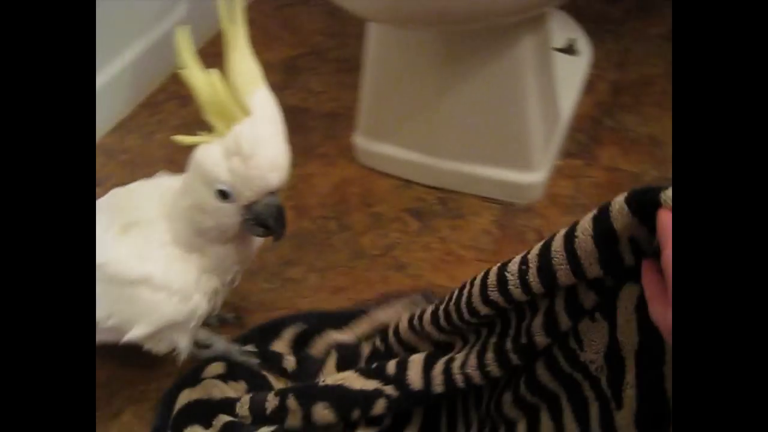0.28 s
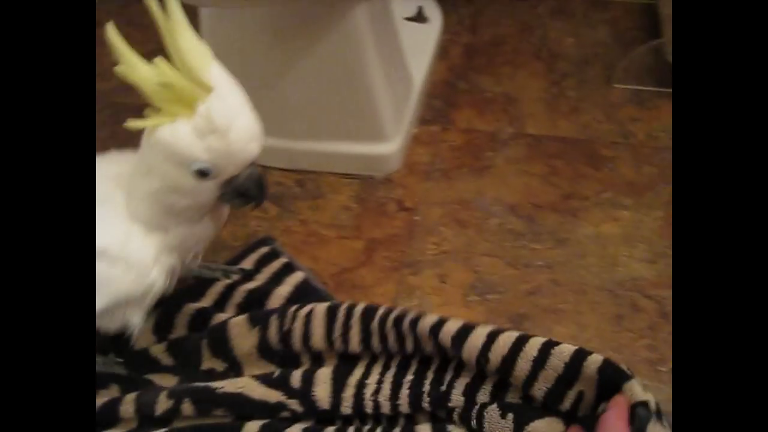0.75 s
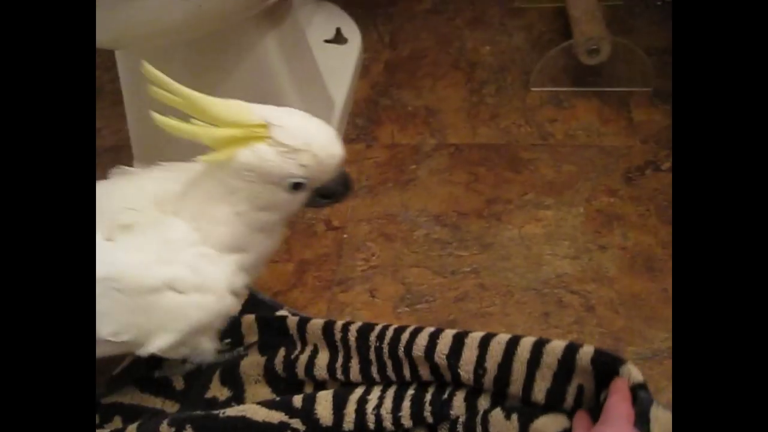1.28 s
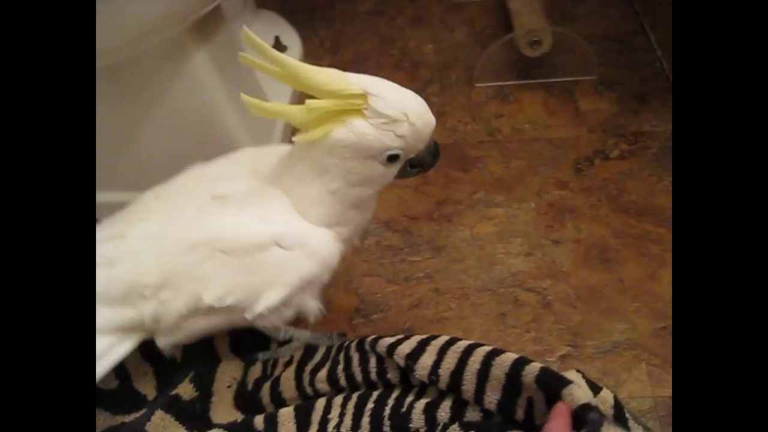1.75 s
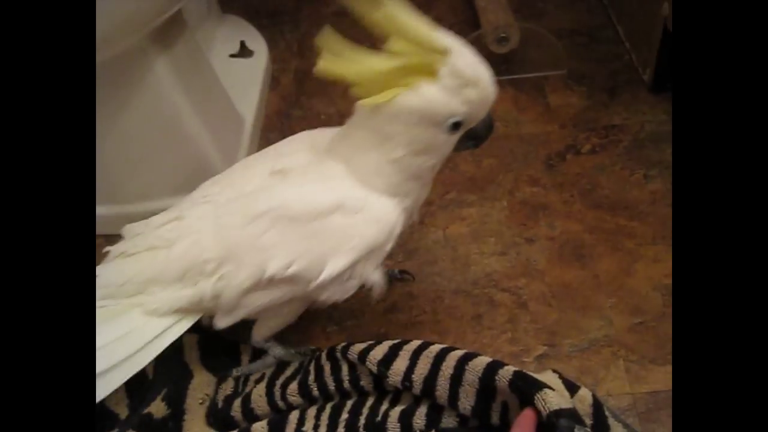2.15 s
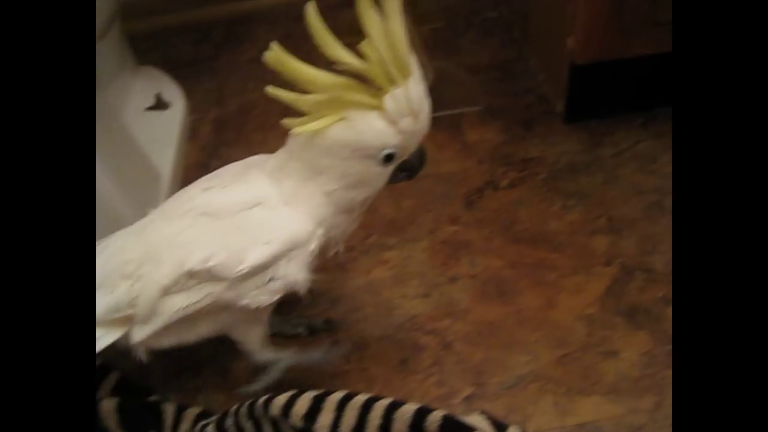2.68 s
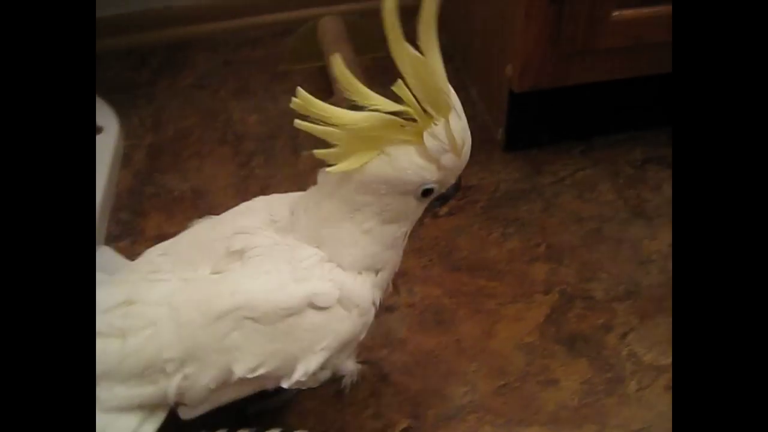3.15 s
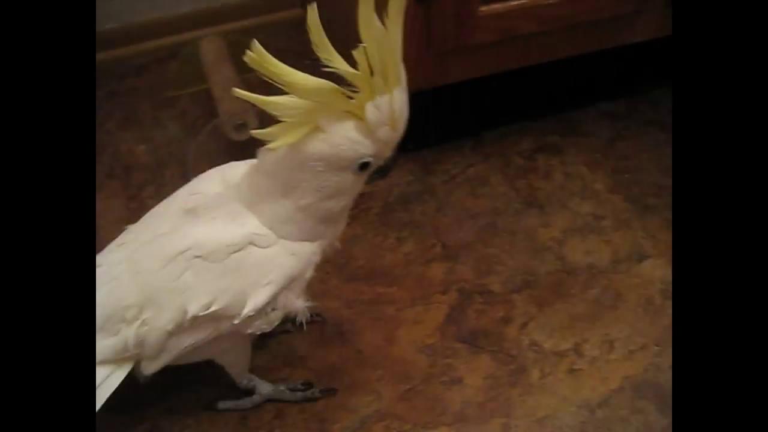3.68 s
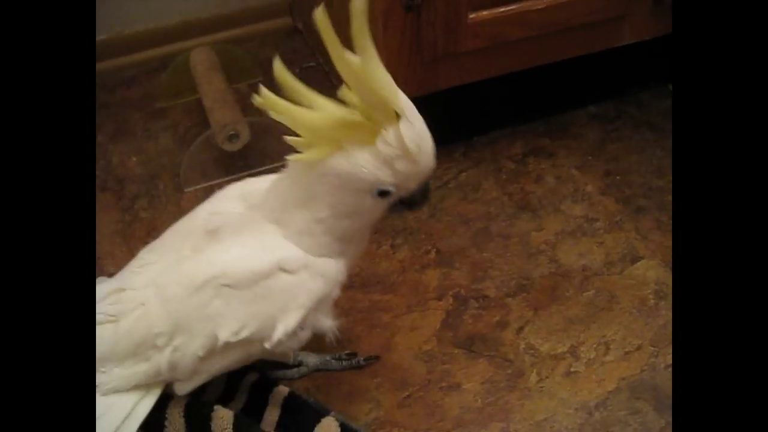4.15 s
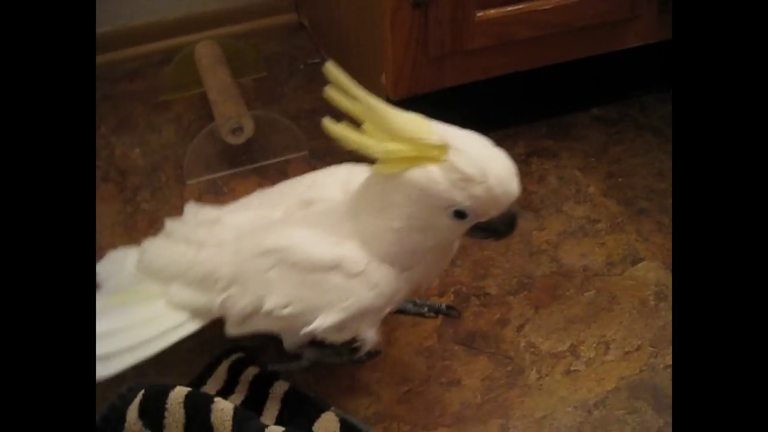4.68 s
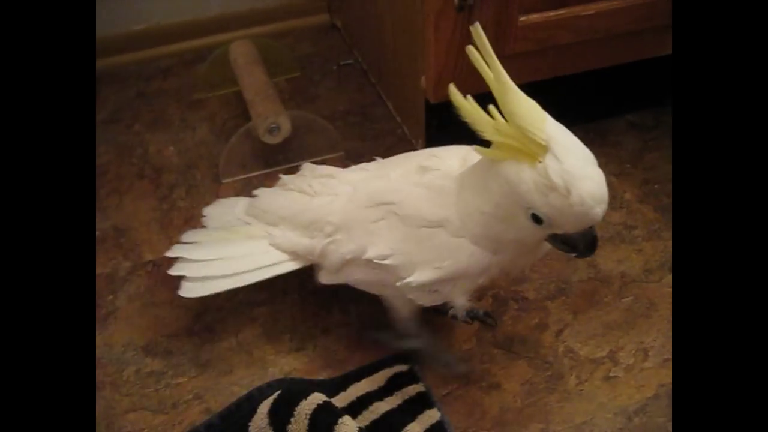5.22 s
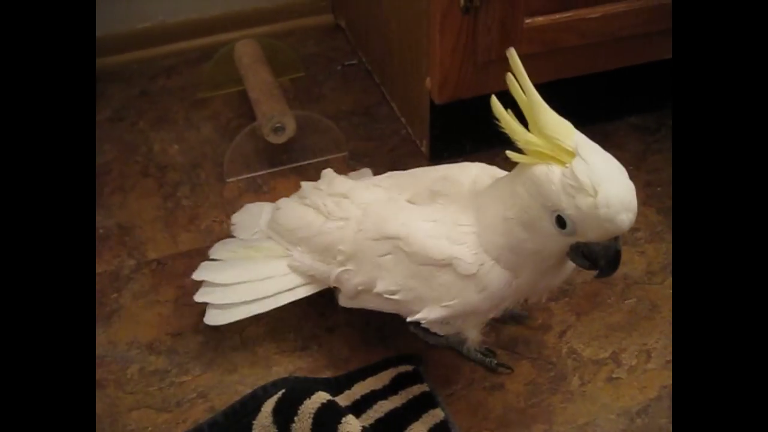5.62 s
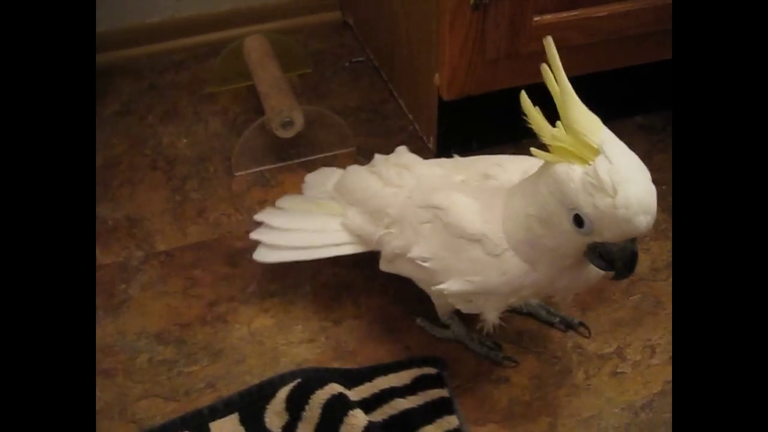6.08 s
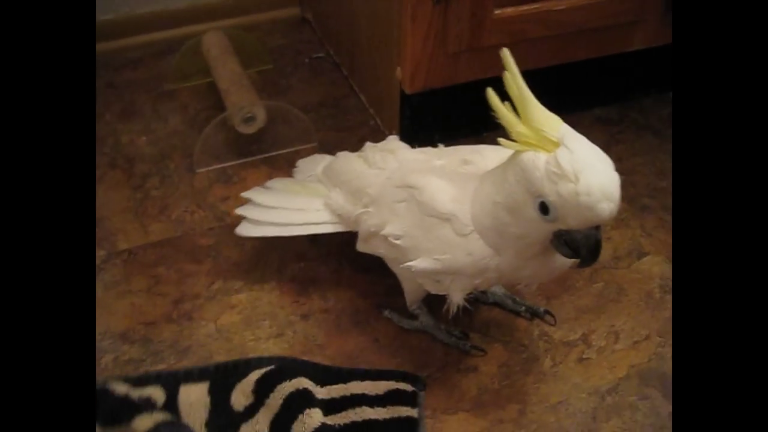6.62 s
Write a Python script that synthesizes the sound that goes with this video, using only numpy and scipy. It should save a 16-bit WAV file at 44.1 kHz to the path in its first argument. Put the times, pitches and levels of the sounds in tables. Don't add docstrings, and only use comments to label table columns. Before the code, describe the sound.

In a small hard-walled bathroom, a cloth drags over the floor while a big parrot's claws tick and snap on vinyl, close to a small camera microphone. A few steps land hard with a slight floor thump. Later, short falling clucks join soft swishes of feet and feathers, then the bird quiets. Fan hum and hiss continue throughout.

```python
import sys
import numpy as np
from scipy import signal
from scipy.fft import rfft, irfft
from scipy.io import wavfile
from scipy.ndimage import uniform_filter1d

SR = 44100
rng = np.random.default_rng(int(sys.argv[2]) if len(sys.argv) > 2 else 0)


def voltage_ratio(level):
    return 10 ** (np.asarray(level, float) / 20)


def store_pcm(level_fs):
    pcm = np.round(np.clip(level_fs, -1, 1) * 32767).astype(np.int16)
    wavfile.write(sys.argv[1], SR, np.atleast_2d(pcm).T)


N = 301991


def evened(x):
    return x / np.sqrt(np.mean(x ** 2) + 1e-20)


def read(points, hz):
    f, value = np.transpose(points)
    return np.interp(np.log(hz + 1), np.log(f + 1), value)


def add(mix, s, sound):
    part = mix[round(s * SR):][:len(sound)]
    part += sound[:len(part)]


def resonate(x, hz, width):
    turn = np.exp(2j * np.pi * np.cumsum(hz * np.ones(len(x))) / SR)
    r = np.exp(-np.pi * width / SR)
    return 2 * (turn * signal.lfilter([1 - r], [1, -r], x / turn + 1e-18)).real


def coloured(x, points):
    gain_db = np.maximum(read(points, abs(np.fft.fftfreq(2048, 1 / SR))), -100)
    log_gain = np.log(voltage_ratio(gain_db))
    taps = np.fft.ifft(np.exp(np.conj(signal.hilbert(log_gain)))).real[:1024]
    return signal.oaconvolve(x, taps)[:len(x)]


def tails(count):
    # (frequency [Hz], t60 [s])
    room_t60 = [(250, 0.48), (450, 0.34), (800, 0.31), (1700, 0.28), (4600, 0.28), (10000, 0.28)]
    shape = (count, SR // 2)
    taps = rng.choice([-1., 1.], shape) * (rng.random(shape) < .3)
    hz, t, z = signal.stft(taps, SR, nperseg=256)
    decay = voltage_ratio(-60 * t / read(room_t60, hz)[:, None])
    tail = signal.istft(z * decay, SR, nperseg=256)[1]
    tail *= np.clip(np.arange(tail.shape[1]) / SR / 0.0094 - .1, 0, 1)
    return tail / np.linalg.norm(tail, axis=1, keepdims=True)


def in_room(sound, tail, chance, echo_db, wet_db):
    echo_delays = [.9, 2.2, 3.0, 3.6, 5.4, 6.4, 8.2, 11.0]
    echo_levels = [0.5, -6.5, -1.5, 0.5, -7, -1.5, -9, -11]
    place = np.int_((echo_delays + .1 * chance[:8]) * SR / 1000)
    echoes = np.zeros(len(tail))
    echoes[place] = voltage_ratio(np.add(echo_levels, echo_db) + 0.9 * chance[8:16])
    scatter = chance[16:] * np.exp(-np.arange(len(chance) - 16) / SR / 0.0005)
    scatter = signal.lfilter(*signal.butter(1, 1800, "high", fs=SR), scatter)
    scatter /= np.linalg.norm(scatter)
    path = voltage_ratio(wet_db) * tail + signal.fftconvolve(echoes, scatter)[:len(tail)]
    path[0] += 1
    return signal.fftconvolve(sound, path)


def steady_noise(shape, db):
    hz = np.fft.rfftfreq(N, 1 / SR)
    return voltage_ratio(db) * evened(irfft(rfft(rng.standard_normal(N)) * voltage_ratio(read(shape, hz)), N))


def background():
    # (frequency [Hz], level [dB per Hz])
    fan_wash = [(12, -46), (20, -18), (91, -9), (113, -9), (146, -8.5), (229, -4), (323, -6.5), (401, -2.5),
                (464, -5), (536, -6), (1500, -12.5), (1950, -25), (3300, -120)]
    # (frequency [Hz], level [dB per Hz])
    mic_hiss = [(880, -15.5), (1500, -4.5), (1860, -4.5), (2010, -6), (2840, -4.5), (5010, -7),
                (5530, -7.5), (6480, -8), (7670, -12), (10000, -6.5), (12500, -31), (16200, -65),
                (22000, -120)]
    # (frequency [Hz], level [dB])
    motor_hum = [(59.2, -73), (118.4, -68.5), (177.6, -73), (236.9, -72), (355.3, -68.5), (414.5, -73),
                 (818.3, -74)]
    # (time [s], level [dB])
    whine_course = [(0, -81), (1.9, -69), (2.1, -65), (4.4, -63), (4.6, -61.5), (6.85, -71)]
    t = np.arange(N) / SR
    noise = steady_noise(fan_wash, db=-55.5) + steady_noise(mic_hiss, db=-54)
    hum = sum(np.sqrt(2) * voltage_ratio(db) * np.sin(2 * np.pi * (f * t + rng.random())) for f, db in motor_hum)
    whine = evened(resonate(rng.standard_normal(N), hz=951, width=1.6))
    return noise + hum + voltage_ratio(np.interp(t, *np.transpose(whine_course))) * whine


def thump(db, hz, t60):
    t = np.arange(0, t60, 1 / SR)
    return voltage_ratio(db - 60 * t / t60) * np.sin(2 * np.pi * hz * t) * (1 - np.exp(-t / 0.00089))


def add_thumps(mix):
    # (time [s], peak level [dB], frequency [Hz], t60 [s])
    low_thumps = [
        (1.417, -36, 111, 0.021),
        (1.427, -30.5, 320, 0.061),
        (2.015, -35, 343, 0.084),
        (2.895, -38, 318, 0.098),
        (4.29, -55, 340, 0.083),
    ]
    for s, *blow in low_thumps:
        add(mix, s, thump(*blow))


def swish(db, hz, drag_db, fizz_db):
    # (frequency [Hz], level [dB per Hz])
    cloth_colour = [(710, -28), (1200, -42), (1490, -8), (2110, -9.5), (3220, -2), (3820, -3), (4340, -5.5),
                    (6720, 1), (7800, -14.5), (10100, -21), (17200, -120)]
    # (frequency [Hz], level [dB per Hz])
    drag_colour = [(300, -19.5), (700, -1.5), (1500, -4), (2500, -2), (3500, -34)]
    # (frequency [Hz], level [dB per Hz])
    fizz_colour = [(4590, -13), (7800, -6), (9540, -1.5), (10500, -2.5), (11100, -8), (11700, -16.5),
                   (12500, -56), (16200, -64), (22000, -120)]
    slips = rng.standard_normal((3, len(db))) * voltage_ratio(2.1 * rng.exponential(1, len(db)))
    slips *= voltage_ratio(1.1 * evened(uniform_filter1d(rng.standard_normal(len(db)), 220)))
    peak = resonate(resonate(slips[0], hz, 1900), hz, 1900)
    rustle = evened(coloured(slips[0] + 2.3 * peak, cloth_colour))
    strand = evened(resonate(resonate(slips[0], hz, 600), hz, 600))
    drag = voltage_ratio(drag_db) * evened(coloured(slips[1], drag_colour))
    fizz = voltage_ratio(fizz_db) * evened(coloured(slips[2], fizz_colour))
    return voltage_ratio(db - 2.0) * (rustle + voltage_ratio(-15) * strand + drag + fizz)


def towel():
    # (time [s], level [dB])
    towel_course = [
        (0.0, -55),
        (0.15, -53),
        (0.202, -56),
        (0.438, -48.5),
        (0.566, -52),
        (0.668, -62),
        (0.762, -51),
        (0.942, -58),
        (1.35, -62.5),
    ]
    t = np.arange(0, 1.35, 1 / SR)
    db = np.interp(t, *np.transpose(towel_course))
    drag = swish(db, hz=4400, drag_db=-3, fizz_db=-4)
    return 0, drag * signal.windows.tukey(len(t), .02)


def stroke(s, rise, fall, db, hz, drag_db, fizz_db, sag=1):
    t = np.arange(-.3, .6, 1 / SR)
    away = np.minimum(np.where(t < 0, -t / rise, t / fall), 3)
    lost_db = 30 * away ** 1.64
    sag_db = sag * np.where(t < 0, 0.14, 0.17) * np.minimum(lost_db, 20)
    return s + t[0], swish(db - lost_db, hz * voltage_ratio(-sag_db), drag_db, fizz_db - 0.65 * lost_db)


def add_rubs(mix, tail, chance):
    # (fastest moment [s], speeding up [s], slowing down [s], peak level [dB], brightest [Hz])
    sweeps = [(0.433, 0.026, 0.092, -33, 5200), (1.928, 0.04, 0.025, -37, 4900),
              (3.225, 0.026, 0.073, -37.5, 4750), (3.57, 0.1, 0.14, -36, 5000),
              (3.948, 0.074, 0.13, -35, 4280), (4.05, 0.023, 0.083, -49, 4120),
              (4.348, 0.054, 0.19, -33.5, 5400), (4.54, 0.11, 0.03, -45, 3300),
              (4.595, 0.044, 0.09, -43, 4650), (5.225, 0.13, 0.12, -32.5, 4600),
              (5.61, 0.061, 0.24, -38, 5070), (5.7, 0.2, 0.15, -42, 4300), (5.11, 0.072, 0.11, -42, 4260),
              (4.43, 0.08, 0.094, -40, 3680)]
    heavy_scuffs = [
        (0.566, 0.086, 0.11, -45.5, 4270),
        (0.665, 0.02, 0.075, -47, 4400),
        (2.85, 0.12, 0.034, -51, 4000),
        (3.058, 0.071, 0.069, -41.5, 5200),
        (3.115, 0.02, 0.14, -42, 3050),
        (5.05, 0.17, 0.12, -50.5, 3230),
        (5.281, 0.075, 0.027, -41, 4200),
    ]
    feather_ruffles = [
        (6.33, 0.16, 0.47, -49, 5340),
        (6.55, 0.4, 0.54, -54, 4240),
        (6.86, 0.13, 0.1, -52, 4400),
    ]
    rubs = [towel()]
    rubs += [stroke(*row, drag_db=-22, fizz_db=-6.5) for row in sweeps]
    rubs += [stroke(*row, drag_db=-3, fizz_db=-6.5, sag=.4) for row in heavy_scuffs]
    rubs += [stroke(*row, drag_db=-7, fizz_db=2, sag=.15) for row in feather_ruffles]
    for k, (s, sound) in enumerate(rubs):
        add(mix, s, in_room(sound, tail[k % 5], chance[k], echo_db=-17.0, wet_db=-12.0))


def cluck(length, start_hz, end_hz, db, overtone_db):
    # (frequency [Hz], width [Hz], level [dB])
    windpipe_modes = [(2150, 260, -6), (2380, 160, -3), (2850, 330, -4.5)]
    # (frequency [Hz], level [dB per Hz])
    throat_colour = [(220, -16.5), (380, -4), (750, 3.5), (1150, 0), (1500, -3), (2300, 0), (2900, 1),
                     (3500, -7), (4100, -6.5), (4800, -9.5), (6000, -14.5), (7300, -20.5)]
    u = np.arange(0, 1, 1 / (length * SR))
    air = rng.standard_normal((2, len(u)))
    hz = end_hz + (start_hz - end_hz) * np.clip(1 - u / .65, 0, 1)
    turns = np.cumsum(hz * (1 + .07 * evened(uniform_filter1d(air[0], 60)))) / SR
    effort = np.sin(np.pi * u ** .65)
    pulse = np.cos(2 * np.pi * turns)
    overtones = sum(np.cos(2 * np.pi * k * turns) * (k * hz < 7000) for k in range(2, 16))
    overtones = overtones + voltage_ratio(-15) * (1 + pulse) * 2 * air[1]
    drive = effort ** 0.85 * pulse + voltage_ratio(overtone_db) * effort ** 2.0 * overtones
    drive = np.pad(drive, (0, 600))
    ringing = sum(voltage_ratio(gain_db) * resonate(drive, f, w) for f, w, gain_db in windpipe_modes)
    throat = coloured(drive + ringing, throat_colour)
    return voltage_ratio(db) * throat / abs(throat).max()


def add_clucks(mix, tail, chance):
    # (time [s], length [s], start [Hz], end [Hz], peak level [dB])
    calls = [
        (4.337, 0.018, 864, 810, -30.5),
        (4.543, .013, 1080, 640, -21),
        (4.724, 0.016, 2230, 2180, -38),
        (4.775, .016, 950, 470, -13),
        (5.018, 0.024, 844, 360, -22),
        (5.273, 0.025, 1300, 580, -30),
        (5.479, .045, 2300, 598.5, -19.5),
        (5.736, .049, 2600, 510, -23),
    ]
    for k, (s, length, start_hz, end_hz, db) in enumerate(calls):
        overtone_db = -14.5 + 0.4 * (db + 21.5) + 230 * length
        voice = cluck(length, start_hz, end_hz, db, overtone_db)
        add(mix, s, in_room(voice, tail[k % 5], chance[-1 - k], echo_db=-5, wet_db=-4))


def tick(db, hz, thud_db, treble_db):
    # (frequency [Hz], level [dB per Hz])
    claw_colour = [(1000, -39.5), (1700, -4.5), (2240, -2), (3260, -2.5), (3880, -3), (4790, -4),
                   (6570, -4), (7960, -14), (9030, -6.5), (10800, -11), (12500, -35.5), (16200, -37),
                   (22000, -120)]
    snap = np.eye(1, 900)[0]
    ring = resonate(snap, hz, 1100) + 0.65 * resonate(snap, hz * 1.386, 670)
    lifted = [(f, level + treble_db * (f > 7500)) for f, level in claw_colour]
    claw = coloured(snap + ring, lifted)
    pad = resonate(resonate(snap, 835, 990), 835, 990)
    return voltage_ratio(db - 2.0) * (claw / abs(claw).max() + voltage_ratio(thud_db + 10.5) * pad / pad.max())


def add_ticks(mix, tail, chance):
    # (time [s], peak level [dB], ring [Hz], pad thud [dB re tick], treble lift [dB])
    open_ticks = [(0.13, -28, 3180, -15, -11), (0.499, -38.5, 4400, -1, -4), (0.616, -22.5, 3470, -24, -6),
                  (0.94, -36, 1900, -14, -4), (1.199, -36, 3280, -18, 3), (1.418, -5, 4400, -26.5, 2),
                  (1.713, -36, 4930, -19, 2), (2.866, -15, 3560, -23.5, -4), (3.099, -23.5, 2940, -21, -10),
                  (3.922, -32, 4000, -33, -6), (5.009, -38, 3600, -30, -10), (4.81, -29, 9800, -30, -3),
                  (0.253, -17, 5070, -30, -1.5), (0.645, -16, 6100, -32, 2),
                  (4.568, -14, 4130, -23.5, -1.5), (0.483, -20, 4400, -21, 1), (4.648, -38, 8800, -32, 3),
                  (4.828, -33.5, 9600, -30, -1.5), (4.313, -35, 3000, -16, -8)]
    shaded_ticks = [(0.292, -21, 4760, -37, -1.5), (0.432, -19.5, 5500, -30.5, 6),
                    (1.124, -37, 3700, -16, 4), (1.387, -27, 2220, -9.5, -4), (1.737, -10, 3360, -22.5, -2),
                    (1.927, -25, 4600, -28, -8), (1.985, -15.5, 4300, -30, -2.5),
                    (2.004, -9.5, 4730, -29.5, 4), (2.3, -32.5, 2650, -11.5, -7),
                    (2.425, -33, 3170, -31, -3), (2.557, -35, 5200, -21, 9), (2.878, -9.5, 5960, -26, -0.5),
                    (3.2, -15.5, 4650, -28, -0.5), (3.987, -21, 5270, -30, -10),
                    (4.045, -35.5, 3970, -20, -1), (5.164, -29.5, 4480, -21, 4)]
    tick_delay_s = .0011
    for k, (s, *touch) in enumerate(open_ticks + shaded_ticks):
        echo_db = -0.5 if k < len(open_ticks) else 3.2
        add(mix, s + tick_delay_s, in_room(tick(*touch), tail[k % 5], chance[k], echo_db, wet_db=2.5))


def scene():
    mix, tail = background(), tails(count=5)
    chance = rng.standard_normal((60, 136)).clip(-2, 2)
    add_thumps(mix)
    add_rubs(mix, tail, chance)
    add_clucks(mix, tail, chance)
    add_ticks(mix, tail, chance)
    return mix[None]


def band_limit(x):
    return signal.sosfilt(signal.butter(12, 12650, fs=SR, output="sos"), x)


def record(dry):
    power_db = 10 * np.log10(abs(uniform_filter1d(dry[0] ** 2, 300)) + 1e-12)
    fall = np.arange(N) * 72.0 / SR
    held_db = np.maximum.accumulate(power_db + fall) - fall
    over_db = np.maximum(held_db + 22.5, 0)
    ducked = dry / voltage_ratio(0.025 * uniform_filter1d(over_db, 400))
    lowpass = signal.firwin(255, 12600, window=("kaiser", 7), fs=SR)
    limited = signal.oaconvolve(ducked, lowpass[None], "same")
    return band_limit(limited)


dry = scene()
out = record(dry)
store_pcm(out)
```